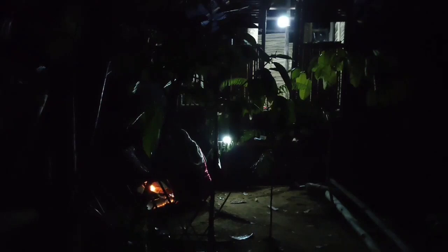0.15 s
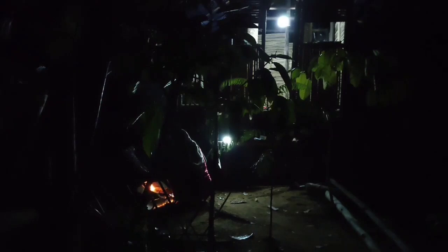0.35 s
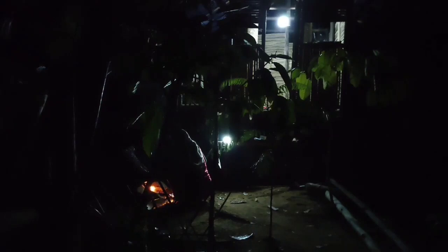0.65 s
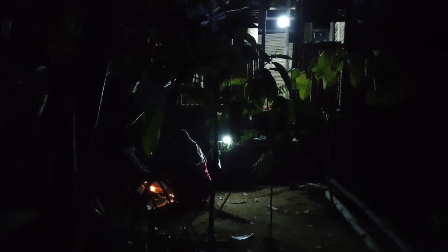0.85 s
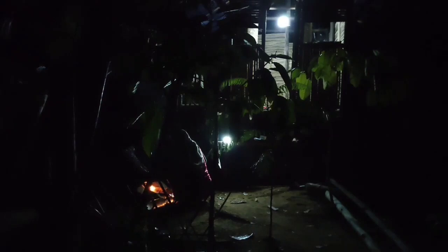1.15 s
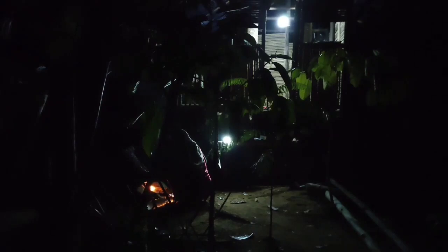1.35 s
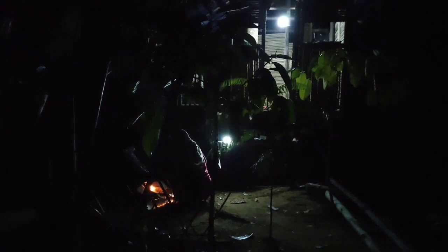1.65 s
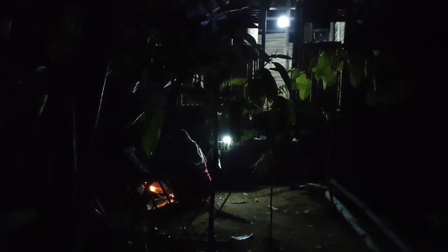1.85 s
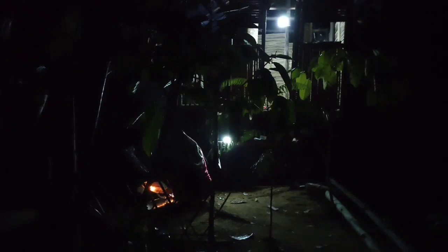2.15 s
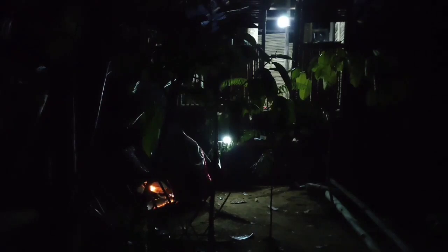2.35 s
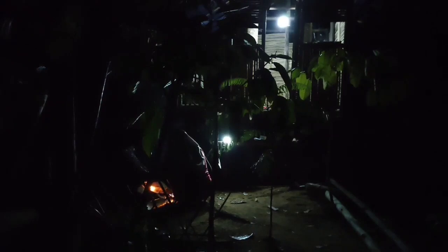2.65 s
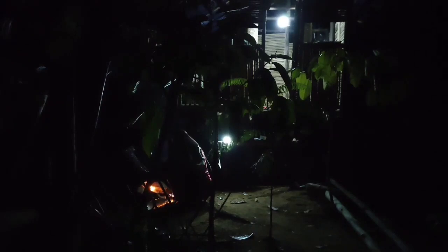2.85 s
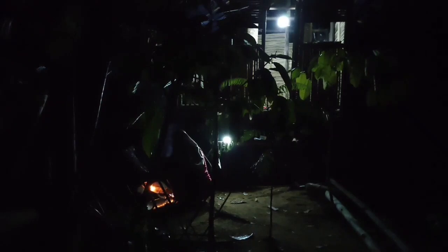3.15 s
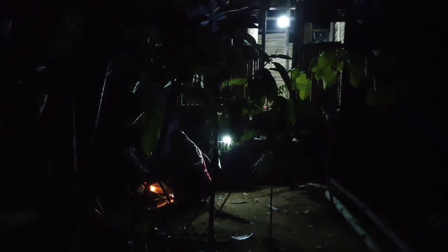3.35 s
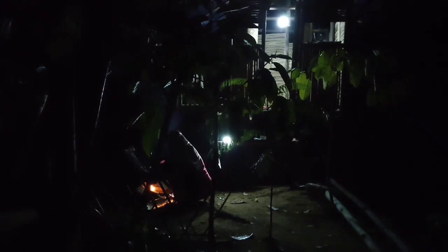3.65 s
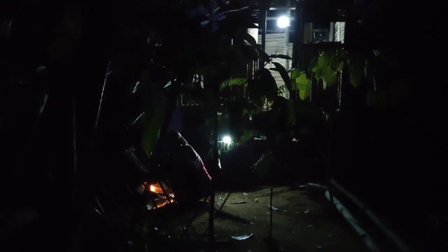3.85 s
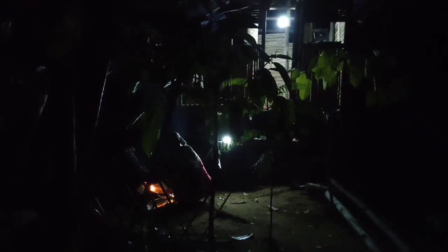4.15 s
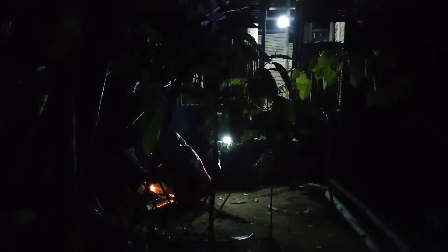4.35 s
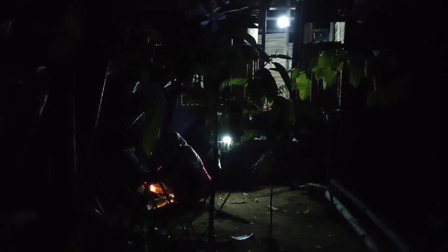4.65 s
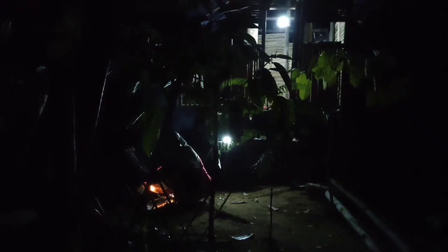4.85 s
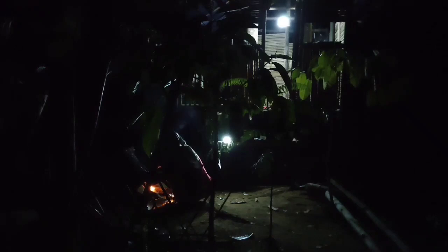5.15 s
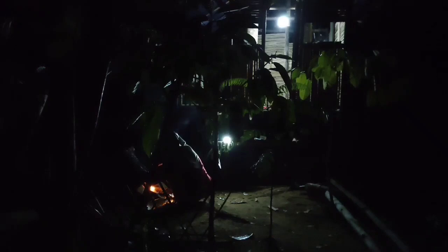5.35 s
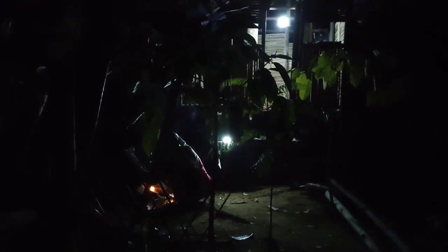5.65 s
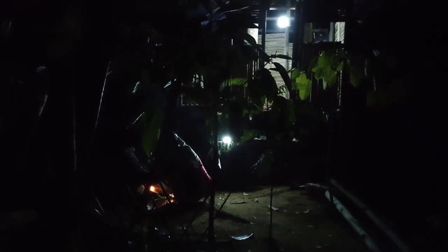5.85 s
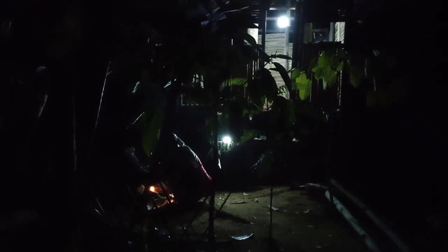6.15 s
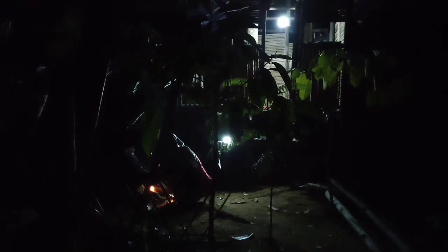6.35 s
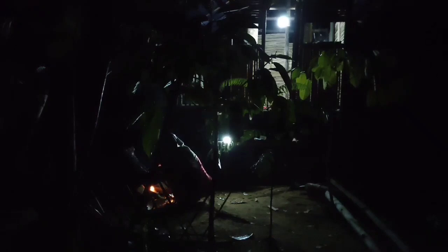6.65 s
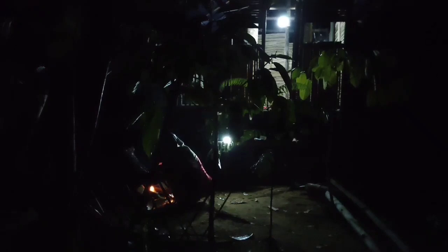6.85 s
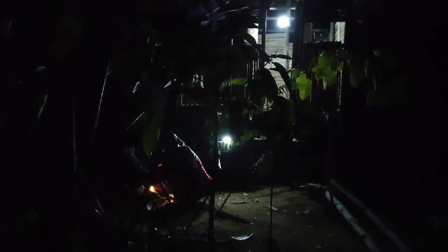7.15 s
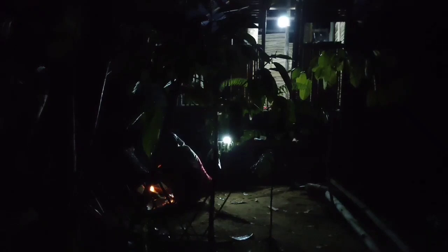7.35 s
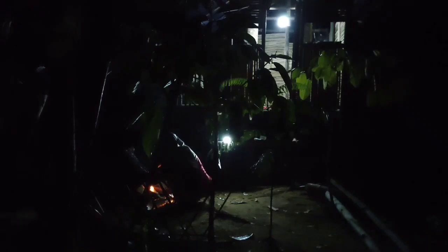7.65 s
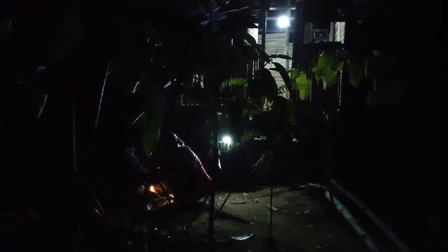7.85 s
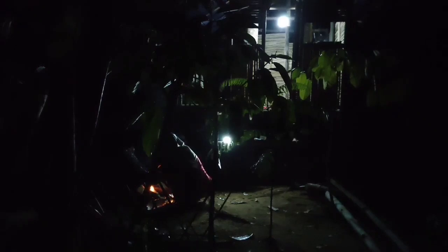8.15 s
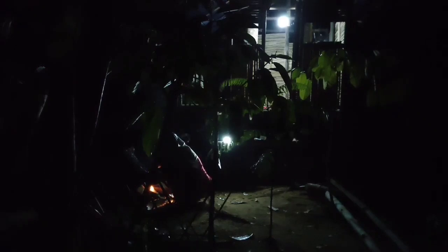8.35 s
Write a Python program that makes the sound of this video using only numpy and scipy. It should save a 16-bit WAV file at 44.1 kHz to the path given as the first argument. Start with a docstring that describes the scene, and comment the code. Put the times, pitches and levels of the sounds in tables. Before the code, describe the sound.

A close cricket on the right gives short, high, two- or three-stroke chirps about five times a second, joined by a second one. Behind them, neighbours, a far chorus and steady trillers form a shimmering bed with dense echoes from the trees. Soft knocks and rubs sound at the microphone, mostly from around four seconds on. The night air is quiet.

```python
"""Field crickets chirp close by on the right in bursts of falling wing strokes, at night in a wooded garden.
Neighbours, a far chorus and steady trillers lie behind them; trunks and leaves scatter it all as dense echoes.
Each wing stroke is a falling tone; the trillers send tone pulses, and the still air is coloured noise.
A few soft knocks and rubs right at the microphone ring the modes of a small body."""
import sys
import numpy as np
from scipy import signal
from scipy.fft import rfft, irfft, next_fast_len
from scipy.io import wavfile

SR = 44100
rng = np.random.default_rng(int(sys.argv[2]) if len(sys.argv) > 2 else 0)


def store_pcm(level_fs):
    """Save levels as 16-bit WAV."""
    pcm = np.round(np.clip(level_fs, -1, 1) * 32767).astype(np.int16)
    wavfile.write(sys.argv[1], SR, np.atleast_2d(pcm).T)


N = 374409
TIME = np.arange(N) / SR

# still night air, spectrum before scaling: (frequency [Hz], relative level [dB])
AIR_SPECTRUM = [(25, 3.5), (60, -0.5), (120, -5.5), (190, -3.5), (330, -10.5), (650, -12.5), (1000, -9.5),
                (1750, -4), (2200, -11), (3500, -22.5), (6000, -39), (9000, -15.5), (11500, -21.5),
                (15000, -22)]
# leaves rustling faintly, before their waver: (time [s], level [dB])
LEAF_LEVELS = [(0, -66), (4.0, -70), (5.2, -62.5), (6.4, -66.5), (7.2, -59.5), (8.2, -56), (8.49, -60.5)]
# kinds of steady trillers:
# (pitch [Hz], pitch spread [Hz], mean pulse rate [1/s], level [dB], left minus right [dB], waver [dB])
TRILLERS = [(2744, 91, 55, -61.5, -1, 3), (3247, 30, 30, -71.5, -7.5, 6), (3695, 80, 27, -65, 3.5, 3),
            (4070, 74, 37, -62, -6, 3.5), (4460, 12, 99, -50.5, -24, -1.5), (4985, 30, 50, -52.5, 1, 5),
            (5659, 33.8, 58, -52.5, 4, 1), (6350, 31, 110, -72, -27, 3), (6643, 26, 23, -68, 6.5, 1.5),
            (6970, 225, 95, -66, -2, 3), (7536, 136, 24, -70, 1, 5.5), (8615, 310, 62, -69, 4, 3)]
# far crickets in groups of like pitch, before the chorus filter:
# (pitch [Hz], level [dB], left minus right [dB])
FAR_GROUPS = [(4419, -48, -3), (4583, -51, -4.5), (4744, -46, 2.5), (4998, -49.5, -2), (5140, -50.5, -19)]
# modes that knocks and rubs ring: (frequency [Hz], relative level [dB], free t60 [s])
BODY_MODES = [(451, -11, 0.13), (518, -9.5, 0.079), (635, -17.5, 0.16), (770, -6.5, 0.036), (842, 3, 0.1),
              (1100, 0.5, 0.054), (1234, -8, 0.15), (1760, -0.5, 0.041), (1955, -8, 0.17), (2400, -8, .05),
              (2600, -10, 0.077), (2800, -10.5, 0.11), (3254, -10.5, 0.31)]
# knocks at the microphone: (time [s], relative level [dB], treble tilt [dB/octave], relative bass [dB],
# relative middle modes [dB], share of the free ring time [1])
KNOCK_EVENTS = [(4.138, -36.5, -6.5, 3.5, -2, 0.38), (4.172, -40, -5, 13, -5, 0.2),
                (4.421, -41.5, -10, 10, 0, 0.37), (4.769, -30.5, -7, 5, 5.5, .3),
                (4.858, -48, -5, 5, 6, .8), (5.150, -25, -2.5, 4, 0, 0.4), (5.241, -45, 4, 10, 0.5, 0.45),
                (6.414, -27, -8, 1.5, -12, 0.42), (7.417, -48, -8, -13, -4, 0.8),
                (7.544, -41.5, -11, -15, -2, 0.68), (7.596, -41, -30, 0, 0, 0.41),
                (7.622, -54, -12, 13, -3, 0.31), (7.694, -44, 4, -12, -7, .35),
                (7.786, -40, -1, 14, -4, 0.5), (7.808, -50, -8, 12, 0, .5), (7.854, -43, -13, 10, 0, .6),
                (8.142, -51, -6, 15, 0, 0.26), (8.189, -45, 1, -6, -3, .35),
                (8.201, -38, -2.5, -2, -6, 0.43)]
# rubs at the microphone: (time of full pressure [s], hold [s], relative level [dB], mode pitch factor [1],
# relative bass [dB])
RUB_EVENTS = [(0.041, 0.034, -58, 0.86, 11), (1.06, 0.14, -70, 0.96, -10), (4.287, 0.046, -58.5, 0.98, 5),
              (4.328, 0.055, -58, 0.98, -10), (4.789, 0.023, -55, 1.23, 5), (6.80, 0.062, -62.5, 1, 6),
              (7.192, 0.027, -63, 1.01, -17), (7.355, 0.062, -60.5, 1.06, -11), (7.526, 0.19, -62.5, 1, -9),
              (7.695, 0.043, -57, 1.07, -11), (7.739, 0.19, -62, 1, 4), (8.013, 0.16, -62, 0.94, -12),
              (8.195, 0.035, -55.5, 1.09, -13)]
# the two near crickets: (mean pitch [Hz], stroke to stroke [s], stroke swell [s], stroke fade [s],
# left minus right of the direct sound [dB])
NEAR_CRICKETS = [(4953, .0333, 0.0045, 0.0057, -25), (4941, 0.035, 0.0033, 0.0047, -9.5)]
# near chirps: (time of first stroke [s], cricket [0 or 1], strokes [count], relative level [dB],
# growth per stroke [dB])
NEAR_CHIRPS = [(.040, 0, 2, -36.5, 4), (.243, 0, 2, -33.5, -0.5), (.437, 1, 1, -42, 0),
               (.585, 1, 2, -44, 4), (.724, 0, 3, -31, 0.5), (.867, 1, 1, -38, 0), (.997, 0, 3, -31, -.5),
               (1.226, 0, 2, -31, 0), (1.424, 0, 3, -29.5, -0.5), (1.600, 1, 1, -36, 2),
               (1.651, 0, 2, -31.5, -4), (1.812, 1, 1, -37, 0), (1.848, 0, 2, -31, -2),
               (2.039, 0, 2, -30.5, 1.5), (2.082, 1, 2, -34.5, 9), (2.207, 1, 2, -33, 1),
               (2.278, 0, 2, -30.5, -2), (2.475, 0, 2, -31.5, -1.5), (2.671, 0, 3, -29, -0.5),
               (2.901, 0, 3, -33, -2.5), (3.095, 0, 2, -34, 2.5), (3.177, 1, 2, -31, 0),
               (3.294, 0, 3, -32, 0), (3.396, 1, 2, -34.5, 0), (3.521, 0, 2, -35, -3),
               (3.579, 1, 2, -34, 3), (3.725, 0, 2, -32.5, 0), (3.785, 1, 2, -32.5, -1),
               (3.923, 0, 2, -29.5, 5), (3.989, 1, 2, -34, -2), (4.157, 0, 2, -34, 5),
               (4.390, 0, 2, -34, 4), (4.592, 0, 2, -37.5, 6), (4.681, 1, 1, -34, 0), (4.765, 0, 1, -37, 0),
               (4.793, 1, 2, -34, 8), (4.890, 1, 2, -39, -1), (4.999, 0, 1, -39, 0), (5.112, 1, 2, -33, 1),
               (5.168, 0, 2, -39.5, 9), (5.290, 1, 1, -42, 0), (5.364, 0, 2, -37, 3),
               (5.519, 0, 2, -32.5, 3), (5.608, 1, 2, -36, -6), (5.720, 0, 3, -30, -0.5),
               (5.810, 1, 2, -34.5, -3), (5.950, 0, 2, -33, -1.5), (6.015, 1, 2, -35, -2),
               (6.148, 0, 3, -30, 1.5), (6.378, 0, 2, -31.5, 2), (6.449, 1, 2, -35, 0),
               (6.575, 0, 2, -30.5, 0.5), (6.650, 1, 2, -36.5, -2), (6.775, 0, 2, -30.5, -4.5),
               (6.854, 1, 2, -33.5, 3), (6.974, 0, 2, -29.5, -1), (7.055, 1, 2, -35, 4),
               (7.172, 0, 3, -30.5, -0.5), (7.293, 1, 2, -32, -2), (7.402, 0, 3, -31.5, -1),
               (7.495, 1, 2, -33, -6), (7.600, 0, 2, -33, -5), (7.798, 0, 2, -33, 3),
               (7.999, 0, 3, -31.5, 0), (8.302, 0, 3, -34.5, 0.5)]

RUB_ATTACK_S, RUB_RELEASE_S = 0.02, 0.042
CHATTER_S, RUB_RING = 0.018, 0.28  # decay of a knock's crackle; share of the free ring time under a rub
# a knock comes back from the ground and the nearest leaves
SPLASH_S, SPLASH_DB, SPLASH_T60_S = 0.005, -7, 0.13
TOP_HZ = 15450


def undb(db):
    """Decibels to gain."""
    return 10 ** (np.asarray(db) / 20)


def level(x, db):
    """Scale to an rms level in dB."""
    return x * undb(db) / np.sqrt(np.mean(x ** 2))


def pan(db):
    """Gains that set left minus right in dB and keep the power."""
    gains = undb(np.array([[db], [-db]]) / 2)
    return gains / np.sqrt(np.mean(gains ** 2))


def add(out, s, x):
    """Mix x into out from time s on."""
    i = int(s * SR)
    a, b = max(i, 0), min(i + x.shape[-1], N)
    if b > a:
        out[..., a:b] += x[..., a - i:b - i]


def walk(rate):
    """Smooth chance that changes about rate times a second."""
    knots = rng.standard_normal(4096)
    return np.interp(TIME * rate, np.arange(len(knots)), knots)


def colour(x, points):
    """Filter by a spectrum of (frequency [Hz], level [dB]) points."""
    hz, db = np.transpose(points)
    size = next_fast_len(N)
    f = np.maximum(np.fft.rfftfreq(size, 1 / SR), 1)
    gain = undb(np.interp(np.log(f), np.log(hz), db))
    return irfft(rfft(x, size) * gain, size)[..., :N]


def convolve(x, response):
    """Pass x through a response for each ear."""
    return signal.oaconvolve(np.atleast_2d(x), np.atleast_2d(response), axes=1)[:, :x.shape[-1]]


def scatter(t60):
    """Dense echoes from trunks and leaves, unrelated left and right, of unit energy."""
    t = np.arange(SR // 2) / SR
    build_up = 1 - np.exp(-t / 0.0039)
    echoes = rng.standard_normal((2, len(t))) * undb(-60 * t / t60) * build_up
    return echoes / np.sqrt(np.sum(echoes ** 2, axis=1, keepdims=True))


def stroke(hz, fall_hz=42000, swell=0.0042, fade=0.01, rasp=0.26, second_db=-41, third_db=-38):
    """One wing closure, strongest near its middle: the scraper slows, so the tone falls (about fall_hz Hz/s)."""
    t = np.arange(-SR // 50, SR // 50) / SR
    # uneven teeth shake both the force and the phase
    grip, slip = (np.interp(t, np.linspace(t[0], t[-1], 16), k) for k in rng.standard_normal((2, 16)))
    fall = fall_hz * (1 + 0.22 * rng.standard_normal())
    phase = 2 * np.pi * (hz * t - fall * t ** 2 / 2 + rng.random()) + rasp * slip
    force = np.where(t < 0, np.exp(-0.5 * (t / swell) ** 2), 1 / np.cosh(t / fade))
    force = force * np.exp(rasp * grip) * signal.get_window(("tukey", 0.5), len(t))
    overtones = undb(second_db) * np.sin(2 * phase) + undb(third_db) * np.sin(3 * phase)
    return force * (np.sin(phase) + overtones)


def distant(times, call, t60, direct_db, waver_db=7.0):
    """One far insect repeats its call, wavering in strength, heard straight and through the trees."""
    # times count from a quarter second before the scene opens, so it is already singing
    beats = np.zeros(N + SR // 4)
    at = (times * SR).astype(int)
    beats[at[(at >= 0) & (at < len(beats))]] = 1
    paths = scatter(t60)
    # its bearing sets the lag between the ears
    paths[[0, 1], rng.integers(0, 16, 2)] += undb(direct_db)
    heard = convolve(beats, convolve(paths, call))[:, -N:]
    return level(heard * undb(waver_db * walk(11)), 0)


def air(air_db=-61.0, shared=0.24, waver_db=2.5):
    """Faint far rumble and hiss, as coloured noise, waver; the leaves stir a little towards the end."""
    hush = rng.standard_normal((2, N)) + shared * rng.standard_normal(N)  # part is common to both ears
    hush = level(colour(hush, AIR_SPECTRUM), air_db) * undb(waver_db * walk(9))
    leaves = colour(rng.standard_normal((2, N)), [(300, -27), (1200, -16), (2100, -14.5), (2500, -4.5),
                                                  (3200, -10), (4000, -24), (8000, -21.5), (15000, -27.5)])
    leaf_db = np.interp(TIME, *np.transpose(LEAF_LEVELS)) + walk(23)
    return hush + level(leaves, 0) * undb(leaf_db)


def trillers(blur_t60=0.21, direct_db=-4, count=3):
    """A few insects of each kind send unbroken trains of tone pulses; shorter pulses have a wider band."""
    out, t = 0, np.arange(-SR // 20, SR // 20) / SR
    for hz, spread_hz, rate, db, pan_db, waver_db in TRILLERS:
        pulse = np.exp(-(2 * np.pi * spread_hz * t) ** 2) * np.sin(2 * np.pi * hz * t)
        for _ in range(count):
            periods = rng.uniform(0.92, 1.08) * (1 + 0.14 * rng.standard_normal(1400)) / rate
            times = np.cumsum(periods) - rng.random()
            trill = distant(times, pulse, blur_t60, direct_db, waver_db)
            out = out + trill * undb(db) * pan(pan_db) / np.sqrt(count)
    return out


def far_crickets(period=0.21, loose=0.1, fall_hz=20000, direct_db=1, count=2):
    """Each cricket keeps its own loose beat; a group takes turns, so the chirps merge into a bed."""
    out = 0
    for hz, db, pan_db in FAR_GROUPS:
        lead = rng.random()
        for k in range(count):
            beats = period * (np.arange(-2, 46) + lead + k / count + loose * rng.standard_normal(48))
            # three strokes to a chirp
            times = beats[:, None] + np.arange(3) * rng.uniform(0.028, 0.038)
            times = times + 0.001 * rng.standard_normal((48, 3))
            call = stroke(hz + 70 * (k - count / 2 + rng.random()), fall_hz)
            song = distant(times, call, 0.26, direct_db, waver_db=-0.5)
            out = out + song * undb(db) * pan(pan_db) / np.sqrt(count)
    # far chorus tone: dip near 4.2 kHz, lift at 4 and 5.4 kHz
    return colour(out, [(4000, 8), (4170, -13.5), (4280, -2.5), (5230, 1.5), (5400, 13), (5800, -8)])


def neighbours(db=-52, hz=4830, stray_s=0.014, pan_db=-1, direct_db=0, count=3):
    """Crickets a little further off keep the nearest one's beat, nearly a quarter second ahead, straying a little."""
    starts = np.array([[s] for s, who, *_ in NEAR_CHIRPS if round(who) == 0])
    out = 0
    for _ in range(count):
        times = starts + stray_s * rng.standard_normal(starts.shape)
        times = times + np.arange(3) * rng.uniform(0.031, 0.036)  # three strokes to a chirp
        times = times + 0.001 * rng.standard_normal(times.shape)
        call = stroke(hz + 50 * rng.standard_normal(), 29500)
        out = out + distant(times, call, 0.26, direct_db) * undb(db) * pan(pan_db)
    return out


def body(treble_db, bass_db, middle_db, ring, pitch=1, detune=0.024):
    """The ring of one blow: soft contact loses treble, the spot weights the modes, a firm hold damps them."""
    t = np.arange(SR // 5) / SR
    out = 0
    for k, (hz, db, t60) in enumerate(BODY_MODES):
        tilt_db = treble_db * max(np.log2(hz / 900), 0)
        spot_db = bass_db * (hz < 700) + middle_db * (1500 < hz < 2200)
        envelope = undb(db + tilt_db + spot_db - 60 * t / (t60 * ring))
        mode_hz = hz * pitch * (1 + detune * rng.standard_normal())
        out = out + (-1) ** k * envelope * np.sin(2 * np.pi * mode_hz * t)
    return out


def handling(chatter_db=-19, chatter_rate=1000, crack_db=-15, crack_s=0.01,
             rub_treble_db=-7, grain_db=3.0, slip_rate=550):
    """Knocks with crack, crackle and echo, and the tiny slips of rubbing, ring the same small body."""
    sound, t = np.zeros(N), np.arange(SR // 3) / SR
    contact = signal.butter(6, [420, 3200], "bandpass", fs=SR, output="sos")

    def slips(rate):
        """Sparse random impulses, about rate a second."""
        return (rng.random(len(t)) < rate / SR) * rng.standard_normal(len(t))

    for s, db, treble_db, bass_db, middle_db, ring in KNOCK_EVENTS:
        push = (t == 0) + undb(chatter_db) * slips(chatter_rate) * np.exp(-t / CHATTER_S)
        knock = convolve(push, body(treble_db, bass_db, middle_db, ring))[0]
        crack = signal.sosfilt(contact, rng.standard_normal(len(t)))
        crack = level(crack, crack_db + treble_db + middle_db) * np.exp(-t / crack_s)
        knock = (knock / np.abs(knock).max() + crack) * undb(db)
        add(sound, s + 0.000724, knock)
        add(sound, s + SPLASH_S, convolve(knock, scatter(SPLASH_T60_S))[0] * undb(SPLASH_DB))

    # each rub presses in, holds and lets go at a spot of its own
    for s, hold, db, pitch, bass_db in RUB_EVENTS:
        pressure = np.interp(t, np.cumsum([0, RUB_ATTACK_S, hold, RUB_RELEASE_S]), [0, 1, 1, 0])
        grains = slips(slip_rate) * undb(grain_db * walk(93.3)[:len(t)])
        rub = convolve(grains, body(rub_treble_db, bass_db, 0, RUB_RING, pitch))[0]
        add(sound, s - RUB_ATTACK_S, pressure * level(rub, db))

    # a mild dip near 400 Hz; the left port hears the middle modes best
    sound = colour(sound, [(100, -5), (260, -1.0), (400, -5), (4000, -1.0), (9000, 0)])
    left = colour(sound, [(550, 0.5), (800, 3.5), (1100, 5.5), (2000, 6.0)])
    right = colour(sound, [(550, -2.5), (800, 8.5), (1100, -11), (2000, -2.0)])
    return np.vstack([left, right])


def chirp(strokes, growth_db, cricket, uneven_db=1.63, arch_db=1.0):
    """A burst of strokes that grows or fades, as (delay [s], sound) pairs; the middle stands out."""
    hz, period, swell, fade, _ = cricket
    for k in range(strokes):
        place = k - (strokes - 1) / 2
        tone = stroke(hz + 30 * rng.standard_normal(), swell=swell, fade=fade)
        db = uneven_db * rng.standard_normal() + growth_db * place - arch_db * place ** 2
        yield k * period - len(tone) / SR / 2, tone * undb(db)


def near_crickets(gain_db=4.8, early_db=-13, late_db=-6.5):
    """Chirps arrive directly, then as short early echoes, drawn afresh for each chirp, and from the deeper
    wood, which colours each cricket its own way."""
    direct, echoes = np.zeros((2, N)), np.zeros((2, N))
    wood = [scatter(0.12) for _ in NEAR_CRICKETS]
    for s, who, strokes, db, growth_db in NEAR_CHIRPS:
        cricket = NEAR_CRICKETS[round(who)]
        early = undb(early_db) * scatter(0.019) * pan(0.7)
        paths = early + undb(late_db) * wood[round(who)]
        for delay, tone in chirp(round(strokes), growth_db, cricket):
            tone = tone * undb(db)
            add(direct, s + delay, tone * pan(cricket[-1]))
            add(echoes, s + delay + 0.0033, signal.fftconvolve(tone[None], paths, axes=1))
    direct[0] = np.roll(direct[0], 5)  # samples: the left ear is further off
    # the wings barely ring at either end of a stroke; the echoes carry more of its low end
    direct = colour(direct, [(4000, -8), (4400, -0.5), (5200, -1.5), (5550, -10), (7000, -2.0)])
    echoes = colour(echoes, [(4100, -8), (4350, -0.5), (5000, -0.5), (9000, -1)])
    return undb(gain_db) * (direct + echoes)


def scene():
    """Everything at the microphone, from the background to the nearest crickets."""
    return air() + trillers() + far_crickets() + neighbours() + handling() + near_crickets()


def record(dry):
    """The recorder cuts the top with a steep low-pass."""
    return signal.sosfilt(signal.ellip(14, 0.2, 70, TOP_HZ, fs=SR, output="sos"), dry)


dry = scene()
out = record(dry)
store_pcm(out)
```